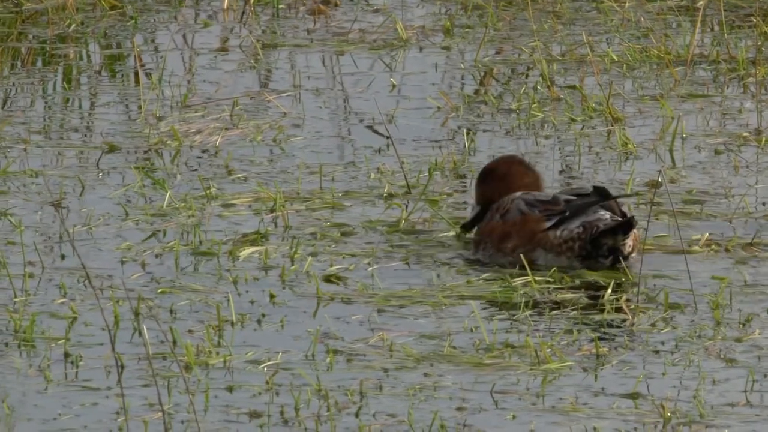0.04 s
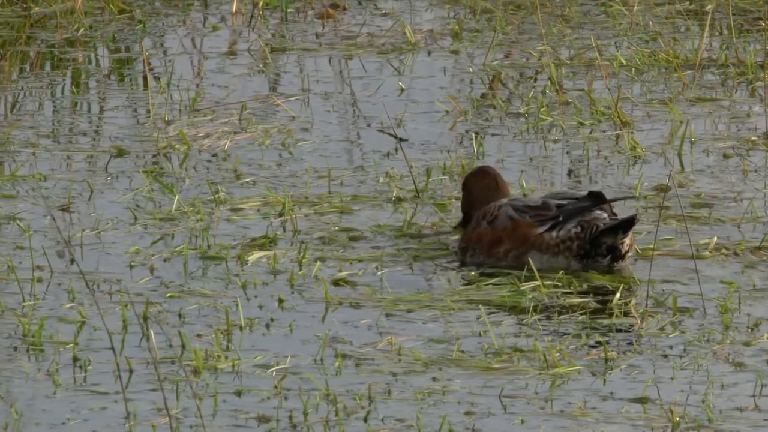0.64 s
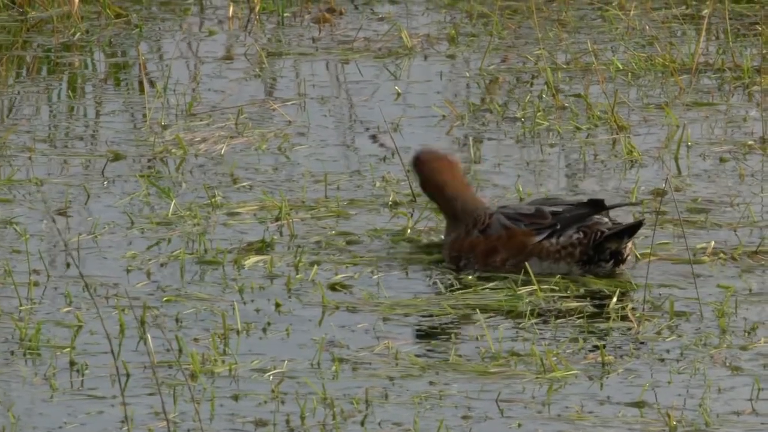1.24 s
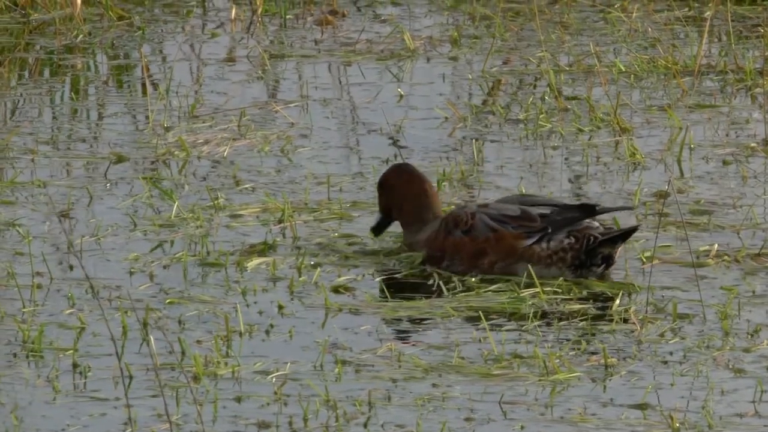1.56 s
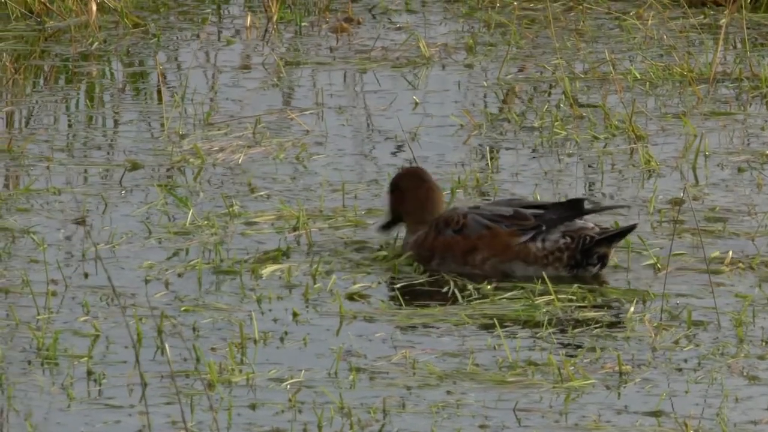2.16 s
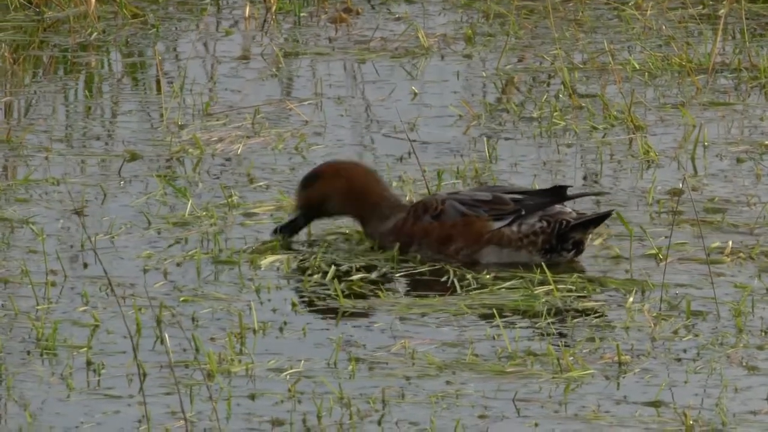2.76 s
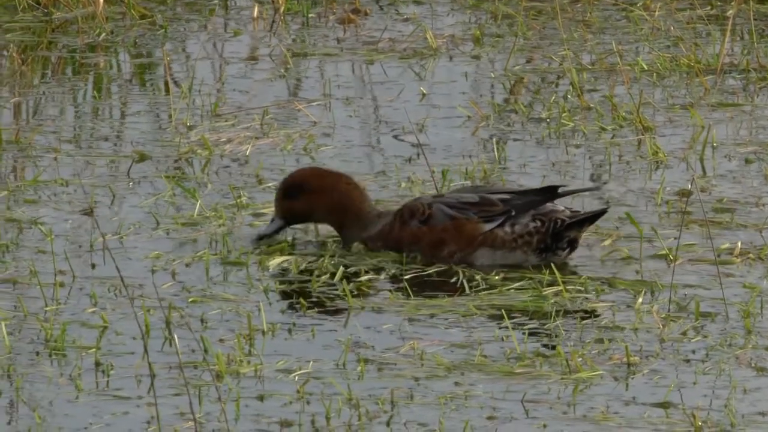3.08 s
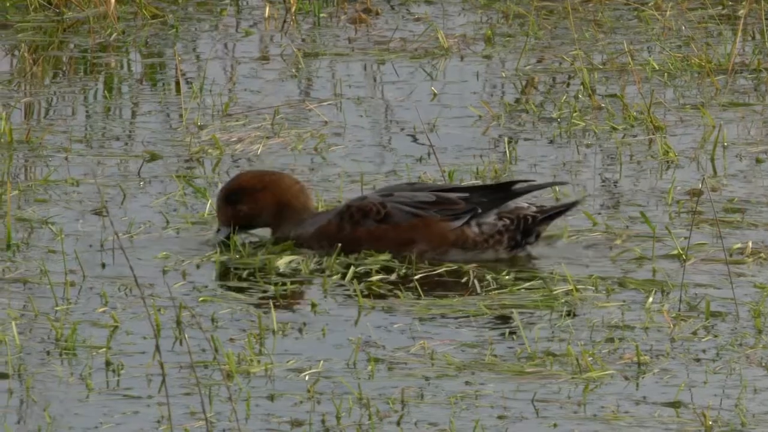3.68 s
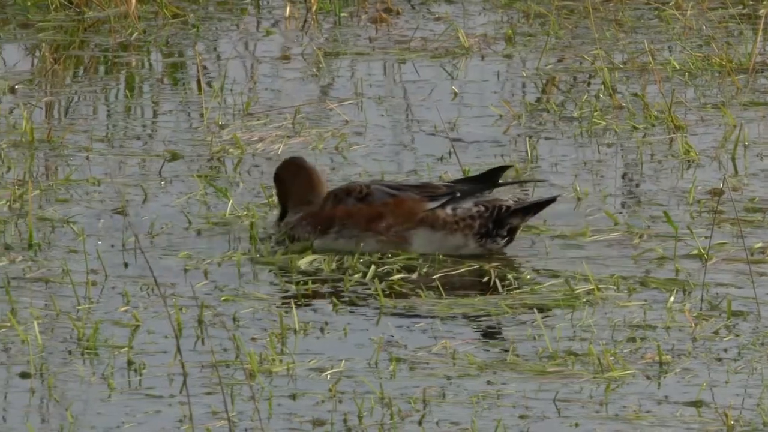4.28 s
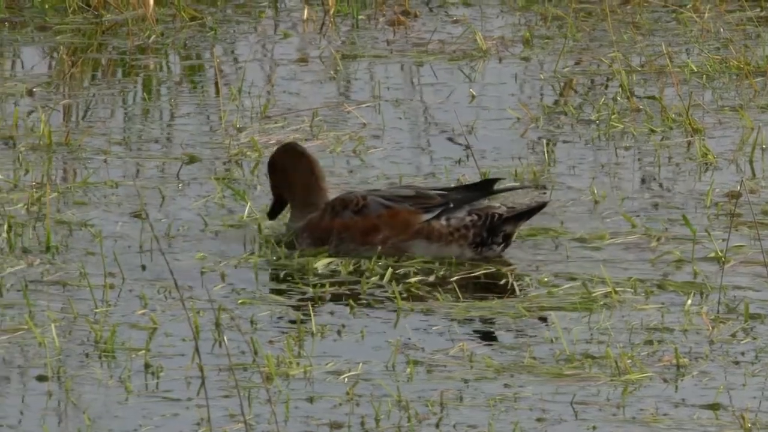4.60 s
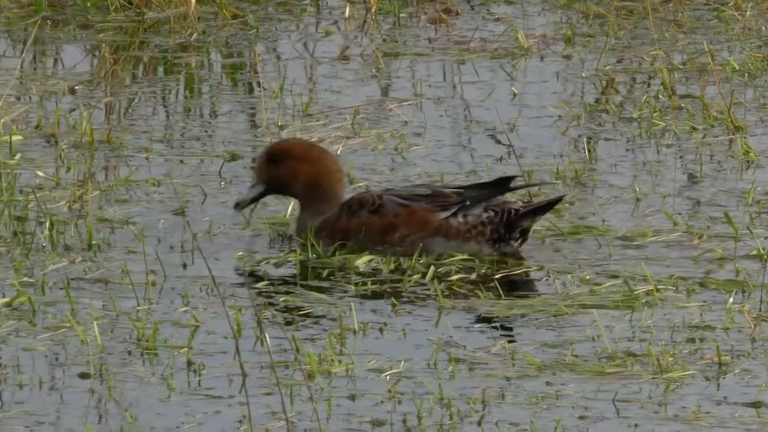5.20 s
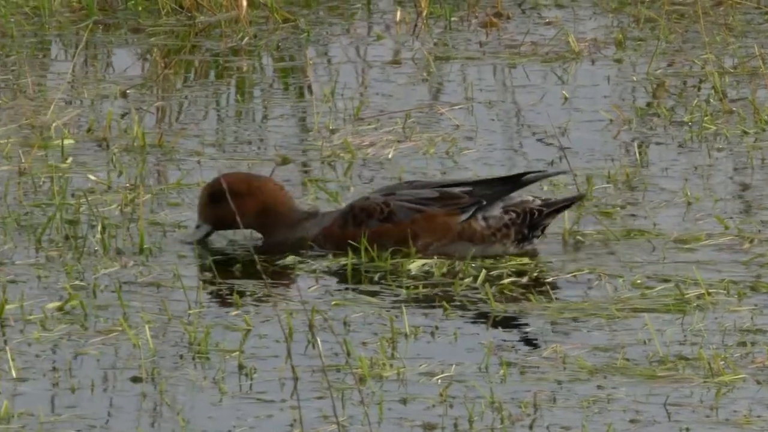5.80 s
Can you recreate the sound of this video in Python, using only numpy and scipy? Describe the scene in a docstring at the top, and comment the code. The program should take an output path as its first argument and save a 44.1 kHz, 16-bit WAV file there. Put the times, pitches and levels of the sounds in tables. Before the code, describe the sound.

A duck's soft whistle and trilled rasps lead into falling gull-like wails and short yelps, over steady wind, water and faint dabbling.

```python
"""Waterbirds on a flooded meadow

A duck's soft whistle and three trilled rasps lead to a run of falling gull-like wails, mixed with
short down-swept yelps; two fainter rasps follow. Wails and rasps are harmonics shaped by throat
resonances, the other calls nearly pure tones. Small birds pip far off, and reeds and banks echo.
Drips, dabbling and fine spray sit on a steady wash of wind and water and a faint low drone."""
import sys
import numpy as np
from scipy import signal
from scipy.fft import rfft, irfft
from scipy.io import wavfile
from scipy.ndimage import uniform_filter1d

SR = 44100
rng = np.random.default_rng(int(sys.argv[2]) if len(sys.argv) > 2 else 0)


def int16_out(signal):
    """Quantize to a 16-bit WAV file."""
    q = np.round(np.clip(np.atleast_2d(signal).T, -1, 1) * 32767)
    wavfile.write(sys.argv[1], SR, q.astype(np.int16))


N = 261954
TIME = np.arange(N) / SR


def wail(s, length, top_hz, settled_hz, sink_s, db, fade_db, first_ring_hz, last_ring_hz, ring_db,
         upper_hz, upper_db, edge_hz, edge_db, hoarse_db, low_db):
    """A hoarse cry that leaps to its top pitch, drops as the tension goes and keeps sagging."""
    leap_s, leap_share, sag_hz_per_s = 0.027, 0.11587, 190
    # Gain of the throat: (frequency [Hz], gain [dB])
    throat_curve = [(500, -57), (1100, -30), (1600, 8), (2000, 4), (2400, 5), (2750, -3), (3050, -9),
                    (3600, -33.5), (4200, -12.5), (4800, -14.5), (5350, -17.5), (6100, -30.5), (6600, -45),
                    (8000, -55.5)]
    t, u = clock(length)
    since_top = np.maximum(t - leap_s, 0)
    tension = 1 / (1 + (since_top / sink_s) ** 2)
    rise = 1 - leap_share * np.maximum(1 - t / leap_s, 0) ** 2
    pitch = rise * (settled_hz + (top_hz - settled_hz) * tension - sag_hz_per_s * since_top)
    ring = rise * (last_ring_hz + (first_ring_hz - last_ring_hz) * tension)
    edge = rise * (5750 + (edge_hz - 5750) * tension)
    resonances = [  # (centre [Hz], width [Hz], lift [dB])
        (1770, 320, low_db),  # a second, lower tone
        (ring, 220, ring_db * (0.75 + 0.25 * tension)),  # picks out one harmonic as a whistle
        (upper_hz * (0.85 + 0.15 * tension), 390, upper_db * tension),
        (edge, 580, edge_db * (0.5 + 0.5 * tension))]  # broad bright edge

    def throat(f):
        lifts = sum(lift * np.exp(-((f - hz) / width) ** 2) for hz, width, lift in resonances)
        return spectrum_at(throat_curve, f) + lifts

    voice = harmonics(pitch * (1 + 0.0044 * wander(len(t), 250)), throat, flicker_db=1.3)
    breath = amp(hoarse_db) * unit(colour(rng.standard_normal(len(t)), throat_curve))
    flutter = 1 + (0.16 + 0.28 * u) * wander(len(t), 100)
    level = amp(db + fade_db * u) * envelope(t, attack=0.026, release=0.066)
    return s, level * (voice * flutter + breath)


def yelp(s, length, first_hz, last_hz, db, rough, bend, swell_db, octave_db):
    """A short note that bends downward ever faster, with its octave above."""
    u = np.linspace(0, 1, int(length * SR))
    pitch = first_hz + (last_hz - first_hz) * u ** bend
    phase = phase_of(pitch * (1 + 0.076 * rough * wander(len(u), 590)))
    tone = (np.sin(phase) + amp(octave_db) * np.sin(2 * phase)) * (1 + rough * wander(len(u), 510))
    return s, np.sqrt(2) * amp(db + swell_db * (u - 0.5)) * tone * signal.windows.tukey(len(u), 0.38)


def rasp(s, length, first_hz, last_hz, db, centre_hz, depth, rough, upper_db, onset_db,
         first_trill_hz, last_trill_hz, swing, calming):
    """A trilled buzz behind two narrow throat resonances; it starts hoarse and clears as it sags."""
    swing_s, onset_s, width_hz, throb_depth = 0.019, 0.037, 205, 0.24
    t, u = clock(length)
    size = len(t)
    strain = 1 - calming * np.sin(np.pi / 2 * u)
    rough = rough * strain
    trill_hz = first_trill_hz + (last_trill_hz - first_trill_hz) * u
    beat = np.cumsum(trill_hz * (1 + 0.0031 * wander(size, 5.7))) / SR % 1
    # Each beat scoops the pitch upward; it drops back within a few milliseconds.
    scoop = depth * strain * uniform_filter1d(beat - 0.5, size=180)
    arch = 0.082 * (np.sin(np.pi * beat) - 2 / np.pi)
    glide = first_hz + (last_hz - first_hz) * u ** 0.7
    pitch = glide * (1 + scoop + arch + 0.062 * rough * wander(size, 273))
    # The resonances swing up at the start, overshoot and sink.
    opening = 2 * swing * ((t / swing_s) ** 2 - 1) * np.exp(-(t / swing_s) ** 2 / 2)
    centre = centre_hz * (1 - 0.028 * (u - 0.5) + opening)

    def throat(f):
        lower, upper = (1 / (1 + ((f - hz) / width_hz) ** 2) for hz in (centre, 1.37 * centre))
        gain = lower + amp(upper_db + 18 * (u - 1)) * upper + amp(-40)
        roll_off = (1 + (1200 / f) ** 6) * (1 + (f / 4800) ** 8)
        return 20 * np.log10(gain / roll_off)

    voice = harmonics(pitch, throat, flicker_db=3) * (1 + rough * wander(size, 530))
    throb = 1 - throb_depth + throb_depth * np.sin(np.pi * beat ** 0.51)
    level = amp(db + onset_db * np.exp(-(t / onset_s) ** 2) + 0.9 * wander(size, 30))
    return s, level * envelope(t, attack=0.012, release=0.055) * unit(voice * throb)


def whistle(curve, partials, jitter, flutter_db):
    """A nearly pure note that glides along its curve of pitch and level and trembles a little."""
    s, hz, db = np.transpose(curve)
    t = np.arange(s[0], s[-1], 1 / SR)
    phase = phase_of(np.interp(t, s, hz) * (1 + jitter * wander(len(t), 150)))
    level = amp(np.interp(t, s, db) + flutter_db * wander(len(t), 50))
    return s[0], np.sqrt(2) * level * sum(amp(gain) * np.sin(k * phase) for k, gain in partials)


def pip(s, length, first_hz, last_hz, arch_hz, db):
    """A small bird's pure note, its pitch bowed up or down."""
    t, u = clock(length)
    pitch = first_hz + (last_hz - first_hz) * u + arch_hz * np.sin(np.pi * u)
    phase = phase_of(pitch * (1 + 0.0038 * wander(len(t), 150)))
    return s, np.sqrt(2) * amp(db) * envelope(u, attack=0.304, release=0.3) * np.sin(phase)


def drip(hz, ring_s=0.0034, snap=0.98):
    """A snap of the surface and the brief ring of a tiny bubble."""
    t = np.arange(SR // 50) / SR
    strike = np.sin(2 * np.pi * hz * t) + snap * rng.standard_normal(len(t))
    shape = np.exp(-t / ring_s) * (1 - np.exp(-t / 0.0002))
    band = signal.butter(2, [1100, 5500], "bandpass", fs=SR, output="sos")
    sound = signal.sosfilt(band, strike * shape)
    return sound / abs(sound).max()


def dabbling(drips_per_s=330):
    """A duck dabbles among the weeds: countless tiny drips, a few larger than the rest."""
    # Ebb and flow of the dabbling: (time [s], level [dB])
    activity = [(0, -59), (.45, -60.5), (.8, -93), (1.7, -75), (2.6, -57.5), (4.1, -64.5), (4.5, -61.5),
                (5.05, -64), (5.5, -62), (5.7, -58.5), (5.94, -60.5)]
    pitches = np.geomspace(2500, 4300, num=16)
    patter = np.zeros(N)
    for hz in pitches:
        sizes = amp(2 * np.minimum(rng.exponential(1, N), 3.5))
        hits = rng.random(N) < drips_per_s / len(pitches) / SR
        patter += signal.oaconvolve(sizes * hits, drip(hz))[:N]
    return unit(patter) * amp(np.interp(TIME, *np.transpose(activity)))


def spray(s, length, db, grain_db=4):
    """Fine spray: a grainy burst of high fizz."""
    # Tone of the fizz: (frequency [Hz], gain [dB])
    fizz_colour = [(300, -60), (2500, -18), (5000, 4), (7500, 6), (12500, 3), (15500, -9)]
    size = int(length * SR)
    fizz = rng.standard_normal(size) * amp(grain_db * wander(size, 600))
    return s, amp(db) * unit(colour(fizz, fizz_colour) * signal.windows.tukey(size, 0.7))


def banks(x, t60, delay_s, echoes_per_s=1500):
    """Reeds and far banks scatter a thin tail of echoes."""
    t = np.arange(SR) / SR
    taps = rng.standard_normal(SR) * (rng.random(SR) < echoes_per_s / SR)
    taps *= amp(-60 * t / t60) * (t > delay_s)
    return signal.fftconvolve(x, taps / np.linalg.norm(taps))[:N]


def wash(gain_db=6):
    """Distant wind and water: the mids follow the breeze, the top is a steady, wide hiss."""
    # Tone of the wash: (frequency [Hz], gain [dB])
    wash_colour = [(25, -63), (60, -55), (100, -42), (150, -27.5), (190, -21), (300, -18), (450, -14),
                   (750, -11), (1000, -1), (1500, 3), (2100, -0.5), (2700, -7), (3500, -11), (4500, -16),
                   (6000, -22), (9000, -25.5), (15500, -28)]
    # Strength of the breeze: (time [s], level before the gain [dB])
    breeze = [(0, -53.5), (.8, -57.5), (1.5, -57), (2.3, -54.5), (3.2, -53), (4.0, -58), (4.7, -55),
              (5.2, -59.5), (5.5, -56), (5.7, -54), (5.94, -55)]
    # Stereo width: (frequency [Hz], side relative to mid [dB])
    width = [(30, -20), (300, -76), (4500, -61), (6500, -100), (8000, -18), (15000, -0.5)]
    mid, side = (unit(colour(rng.standard_normal(N), wash_colour)) for _ in range(2))
    breeze_db = np.interp(TIME, *np.transpose(breeze))
    gusts = amp(breeze_db - breeze_db.mean() + wander(N, 21))
    body = colour(mid, [(200, -56), (600, -15), (2500, 1.5), (6000, -17.5)])
    mid = mid + body * (gusts - 1)
    side = colour(side, width)
    return amp(breeze_db.mean() + gain_db) * np.array([mid + side, mid - side])


def drone(width_hz=20):
    """A fuzzy low hum from far away: a narrow band of noise around a drifting pitch."""
    # Drift of the hum: (time [s], pitch [Hz], level [dB])
    drift = [(0, 199.8, -99), (.9, 195, -83), (1.5, 200, -87), (2.8, 213.8, -89), (3.7, 225, -85),
             (4.399, 225.5, -80.5), (5.2, 215.2, -82), (5.5, 214, -92), (5.94, 209.3, -84)]
    s, hz, db = np.transpose(drift)
    phase = phase_of(np.interp(TIME, s, hz))
    hum = wander(N, width_hz) * np.cos(phase) + wander(N, width_hz) * np.sin(phase)
    return amp(np.interp(TIME, s, db)) * hum


def harmonics(pitch, throat, flicker_db):
    """Harmonics of a moving pitch, weighted by the throat's gain in dB; each flickers on its own."""
    k = np.arange(1, 17)[:, None]
    gains = amp(throat(k * pitch) + flicker_db * np.array([wander(len(pitch), 22) for _ in k]))
    # The throat delays each harmonic differently, softening the pulses.
    phases = k * phase_of(pitch) + 1.4 * k ** 2
    return np.sqrt(2) * (gains * np.cos(phases)).sum(0) / np.linalg.norm(gains, axis=0)


def wander(size, hz):
    """Smooth random motion of rms about 1, rolling off above hz."""
    padded = size + SR // 4
    f = np.fft.rfftfreq(padded, 1 / SR)
    return unit(irfft(rfft(rng.standard_normal(padded)) * np.exp(-(f / hz) ** 2)))[:size]


def spectrum_at(points, hz):
    """Gain in dB at hz, interpolated on a log-frequency axis."""
    f, db = np.transpose(points)
    return np.interp(np.log(hz + 1), np.log(f + 1), db)


def colour(x, points):
    """Filters x by a curve of (frequency [Hz], gain [dB])."""
    return irfft(rfft(x) * amp(spectrum_at(points, np.fft.rfftfreq(len(x), 1 / SR))), len(x))


def clock(length):
    """Seconds since the start of a call, and the share of it gone by."""
    t = np.arange(0, length, 1 / SR)
    return t, t / length


def envelope(t, attack, release):
    """Smooth attack, hold and release, in the units of t."""
    fade_in = np.sin(np.pi / 2 * np.clip(t / attack, 0, 1))
    return fade_in * np.sin(np.pi / 2 * np.clip((t[-1] - t) / release, 0, 1))


def phase_of(hz):
    return 2 * np.pi * np.cumsum(hz) / SR


def amp(db):
    return 10 ** (np.asarray(db) / 20)


def unit(x):
    return x / np.sqrt(np.mean(x ** 2) + 1e-20)


def add(mix, s, sound):
    part = mix[max(round(s * SR), 0):][:len(sound)]
    part += sound[:len(part)]


def scene():
    """Near and far birds with their echoes, over the sounds of the water."""
    # Gull-like wails: (time [s], length [s], top pitch [Hz], settled pitch [Hz], sinking time [s],
    # level [dB], fade [dB], first ring [Hz], last ring [Hz], ring lift [dB], upper resonance [Hz],
    # upper lift [dB], bright edge [Hz], edge lift [dB], hoarse noise [dB], low lift [dB])
    wails = [(2.425, 0.25, 705.5, 566, 0.042, -38, -3, 2920, 2080, 13, 5130, 4, 5850, -2, -24, 5.5),
             (2.625, 0.157, 556.6, 520, 0.047, -45.5, -8, 2250, 2000, 5, 4700, 4, 5270, 13, 3.5, 5),
             (2.77, 0.16, 606, 531, 0.06, -39, -2.5, 2460, 2270, 5, 4700, 6, 5670, 9, -9, -5),
             (2.905, 0.22, 516.3, 509, 0.079, -42, -1, 2560, 2400, 9, 4400, 2, 5550, 5, -6, 2),
             (3.217, 0.28, 683.9, 551, 0.056, -37, -11, 2800, 2100, 11, 4900, 13, 6240, 13, -15, 4.5),
             (3.399, 0.24, 510.5, 468, 0.05, -53.5, 2, 2300, 2360, -6, 4570, 10, 5060, 13, 3, 2),
             (3.581, 0.36, 567.6, 498, 0.086, -44.5, -7.5, 2220, 2240, 13.5, 4600, 14, 5260, 8, -4.5, 0.5),
             (3.925, 0.12, 527, 508, 0.052, -53.5, 3, 2560, 2500, 6, 4500, -6, 5300, -9, 1, 2)]
    # Down-swept yelps: (time [s], length [s], first pitch [Hz], last pitch [Hz], level [dB],
    # roughness [0-1], bend [power, 1 = straight], swell [dB], octave [dB])
    yelps = [(2.113, 0.032, 2184, 1896, -32, 0.14, 2.89, 5.5, -22),
             (2.142, 0.016, 1780, 1598, -37, 0, 1.2, -2, -22),
             (2.15, 0.024, 2040, 1950, -46, 0.55, 1.7, -3, -11.5),
             (2.299, 0.0256, 2148, 1780, -46.5, 0.17, 1.6, -2, -29),
             (2.387, 0.0166, 2186, 1860, -36.5, 0.091, 1.64, 4, -29.5),
             (2.399, 0.025, 1856, 1691, -42.5, 0.15, 1.16, 0, -24),
             (2.586, 0.035, 2390, 2122, -34.5, 0.06, 1.75, 0, -28),
             (2.625, 0.04, 2460, 1700, -39, 0.21, 1.048, -15, -26),
             (2.635, 0.025, 3013, 2572, -50.5, 0.07, 1.174, -10, -17),
             (2.65, 0.037, 2404, 2180, -44, 0.36, 1.61, -4, -29),
             (2.801, 0.0393, 2238, 1890, -36, 0.0057, 1.63, -1, -15),
             (2.83, 0.026, 1896, 1500, -36, 0.13, 1.5, -13, -26),
             (2.844, 0.021, 2332, 2250, -38, 0.1, 2, 0, -23),
             (3.047, 0.016, 2413, 2160, -37, 0, 1.72, 0, -22),
             (3.059, 0.0242, 1629, 1410, -42, 0.29, 1.5, 5, -19),
             (3.093, 0.021, 2074, 1842, -38.5, 0.16, 1.6, 0, -22),
             (3.173, 0.036, 2186, 1540, -41, 0.14, 1.84, -5, -17),
             (3.497, 0.037, 2200, 1690, -40, 0.078, 2.06, -7, -15),
             (3.78, 0.04, 2200, 1527, -39.5, 0, 1.5, -9, -24),
             (3.921, 0.026, 2010, 1600, -45.5, 0.267, 1.23, 9, -13.5),
             (3.972, 0.034, 1704, 1500, -49.5, 0.2, 1.7, 7, -27),
             (4.149, 0.03, 2333, 2163, -43, 0.2, 2.1, 0, -25),
             (4.182, 0.0306, 2220, 1900, -51, 0.55, 2, 0, -15.5),
             (4.307, 0.036, 2020, 1560, -50, 0.2, 1.8, 0.5, -17)]
    # Trilled rasps: (time [s], length [s], first pitch [Hz], last pitch [Hz], level [dB],
    # resonance [Hz], trill depth [share], roughness [0-1], final upper resonance [dB], onset gain [dB],
    # first trill rate [Hz], last trill rate [Hz], resonance swing [share], calming [0-1])
    rasps = [(0.479, .235, 482, 362, -40.5, 2040, 0.14, 0.24, -30, -8, 51.7, 35.1, 0.019, 0.6),
             (1.085, 0.28, 428, 365.3, -44.5, 1906, 0.417, 0.14, -3.5, -4, 39.52, 39.1, 0.035, 0.88),
             (1.775, 0.28, 428.3, 391.7, -44.5, 1970, 0.306, 0.21, -8, -1.5, 43.4, 47.1, 0.055, 0.53),
             (4.681, 0.11, 443, 404, -49.5, 2100, 0.21, 0.43, -14.5, -4, 51.3, 39.7, .02, 0.64),
             (5.125, 0.096, 430, 403, -59, 2090, 0.18, 0.37, -13.5, 3, 48, 42, .02, .6)]
    # The duck's soft, wavering whistle: (time [s], pitch [Hz], level [dB])
    duck_whistle = [(0.197, 1572, -73), (.207, 1605, -45), (.226, 1634, -36.5), (.245, 1637, -32.5),
                    (.27, 1609, -40.5), (.281, 1577, -43), (.292, 1530, -40.5), (.35, 1563, -37.5),
                    (.372, 1575, -41), (.384, 1578, -53.5), (.395, 1598, -48), (.41, 1557, -65),
                    (.421, 1548, -45), (.437, 1513, -41), (.452, 1460, -52), (.466, 1405, -43),
                    (.475, 1327, -58)]
    # Its partials: (harmonic [number], gain [dB])
    duck_partials = [(1, 0), (2, -24.5), (3, -22)]
    # A small bird's long, thin whistle: (time [s], pitch [Hz], level [dB])
    thin_whistle = [(1.903, 4220, -74), (1.909, 4010, -56), (1.918, 3915, -42.5), (1.928, 3985, -53),
                    (1.942, 3960, -50), (1.99, 3958, -50), (2.04, 3958, -50), (2.085, 3950, -55.5),
                    (2.135, 3920, -58.5), (2.17, 3940, -65), (2.25, 3980, -87), (2.33, 3990, -62.5),
                    (2.42, 3980, -80)]
    # Small birds' pips: (time [s], length [s], first pitch [Hz], last pitch [Hz], arch [Hz], level [dB])
    pips = [(1.456, 0.0377, 3900, 3790, 112.5, -61.5), (1.494, 0.023, 4320, 4200, 68, -63),
            (1.486, 0.17, 3580, 3480, -33, -60.5), (1.635, 0.06, 3480, 3230, 30, -70),
            (4.303, 0.0089, 3390, 3330, 88, -51), (4.932, 0.032, 3446, 3329, -32, -51)]
    # Drips and bill splashes: (time [s], peak level [dB], pitch [Hz])
    drips = [(0.584, -56, 1415), (0.797, -47, 4360), (1.7586, -46, 4330), (1.7632, -34, 1364),
             (1.789, -43, 3400), (2.106, -34, 1360), (2.227, -42, 4150), (2.637, -36, 2780),
             (4.46, -42.5, 3500), (4.561, -40.5, 3400), (5.341, -44.5, 3350), (5.606, -36.5, 1690),
             (5.748, -39, 2330), (5.839, -34.5, 3170), (5.84, -34, 2370), (5.852, -39.5, 3410)]
    # Bursts of spray: (time [s], length [s], level [dB])
    sprays = [(0.084, 0.038, -70), (.217, .005, -63), (0.289, 0.066, -63), (0.42, 0.037, -69),
              (.471, 0.0036, -61), (0.938, 0.11, -63.5), (1, 0.121, -67.5), (3.292, 0.059, -64),
              (3.376, 0.087, -67)]
    near, far, water = np.zeros((3, N))
    add(near, *whistle(duck_whistle, duck_partials, jitter=0.0039, flutter_db=0.3))
    for row in pips:
        add(near, *pip(*row))
    for row in rasps:
        add(near, *rasp(*row))
    add(near, *whistle(thin_whistle, [(1, 0)], jitter=0.0015, flutter_db=1))
    for row in wails:
        add(far, *wail(*row))
    for row in yelps:
        add(far, *yelp(*row))
    for s, db, hz in drips:
        add(water, s, amp(db) * drip(hz, ring_s=0.0013, snap=0.28))
    for row in sprays:
        add(water, *spray(*row))
    # Tone of the echoes: (frequency [Hz], gain [dB])
    echo_colour = [(1000, 8), (2500, -3), (4500, 5), (6000, -2), (9000, -3)]
    echoes = banks(amp(-15) * near + amp(-10.5) * far, t60=0.67, delay_s=0.024)
    echoes += banks(amp(-14.5) * far, t60=0.32, delay_s=0.005)  # nearby reeds blur the cries
    return near + far + colour(echoes, echo_colour) + water + dabbling() + drone() + wash()


def record(dry):
    """A steep low-pass trims the very top of the treble."""
    low_pass = signal.firwin(767, cutoff=15720, window=("kaiser", 9), fs=SR)
    return signal.oaconvolve(dry, low_pass[None], "same")


dry = scene()
out = record(dry)
int16_out(out)
```